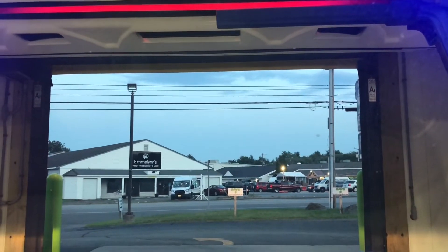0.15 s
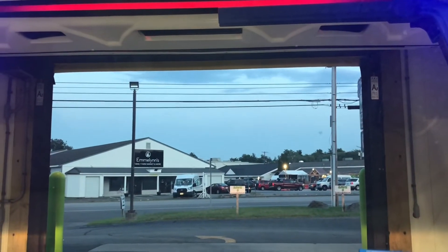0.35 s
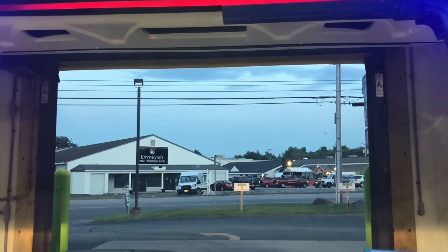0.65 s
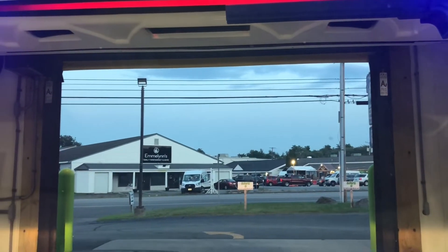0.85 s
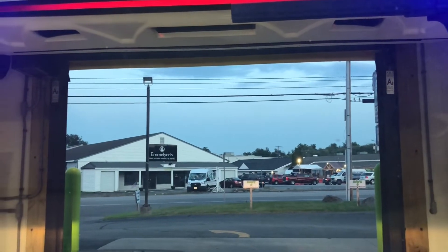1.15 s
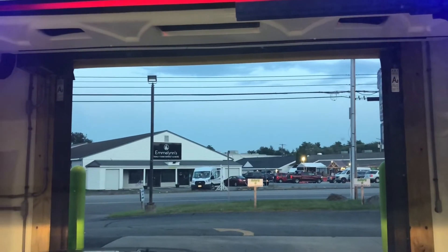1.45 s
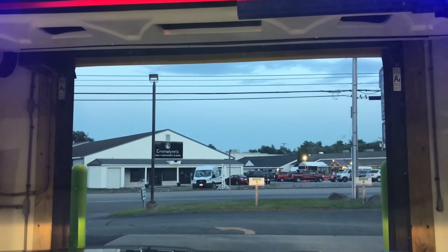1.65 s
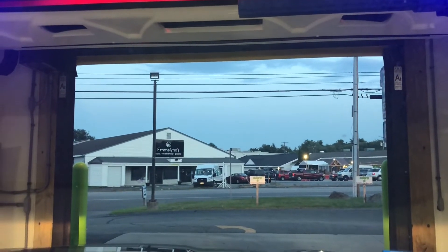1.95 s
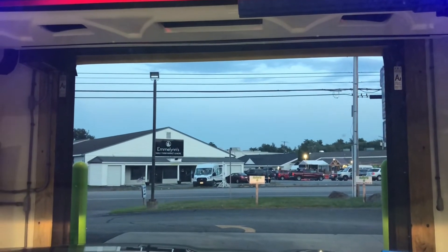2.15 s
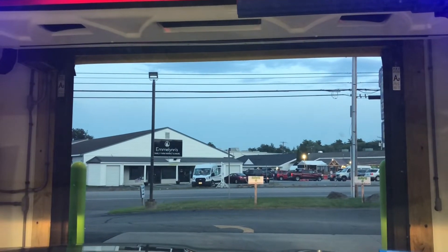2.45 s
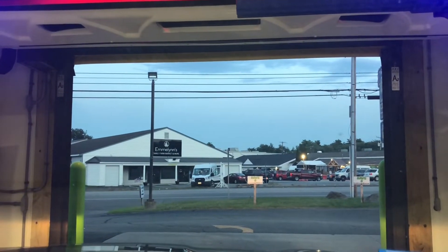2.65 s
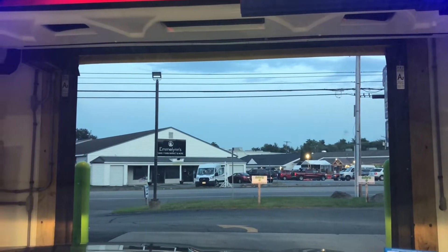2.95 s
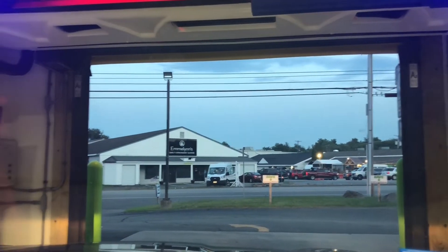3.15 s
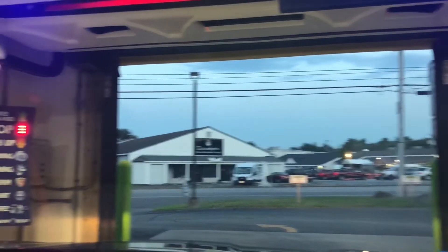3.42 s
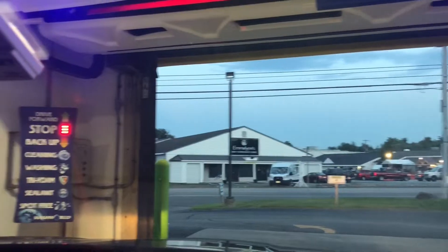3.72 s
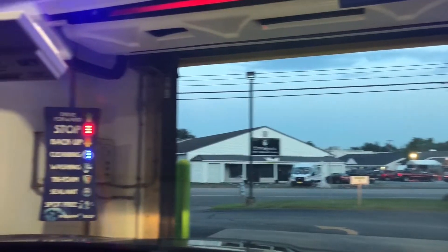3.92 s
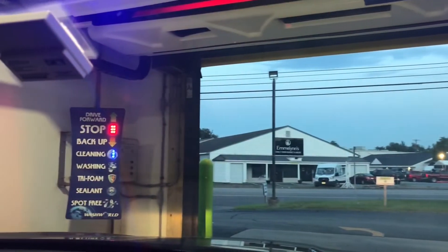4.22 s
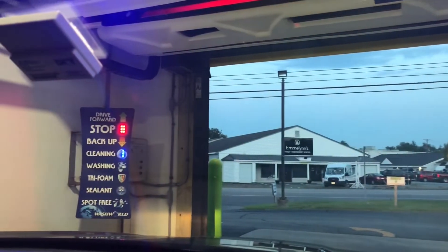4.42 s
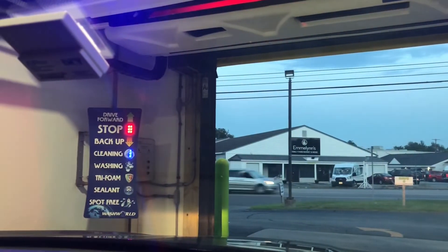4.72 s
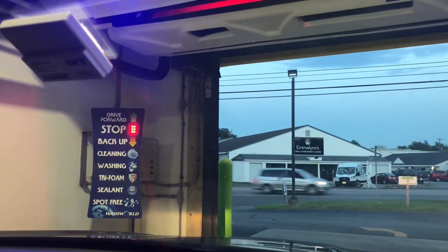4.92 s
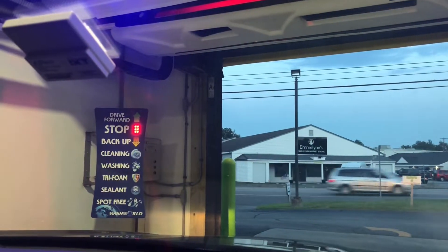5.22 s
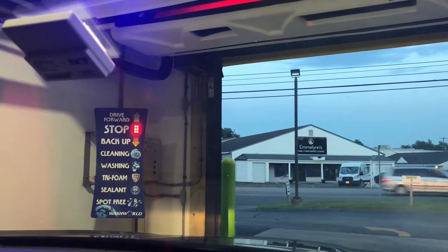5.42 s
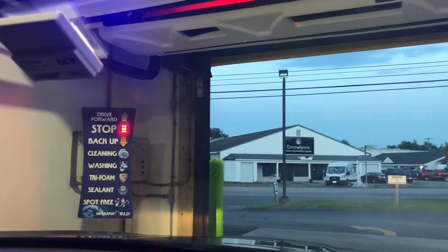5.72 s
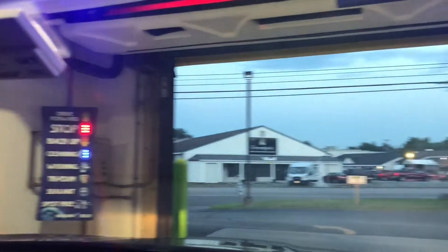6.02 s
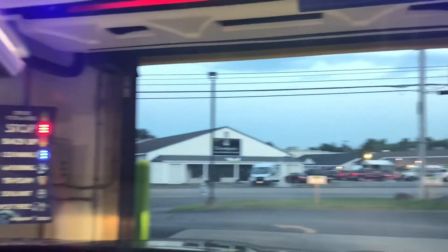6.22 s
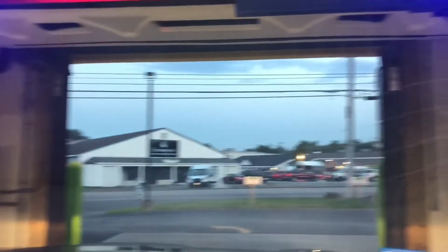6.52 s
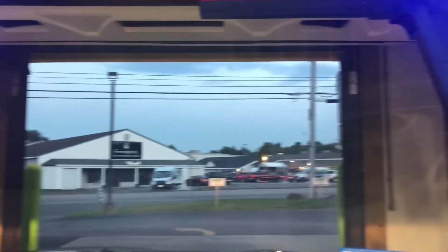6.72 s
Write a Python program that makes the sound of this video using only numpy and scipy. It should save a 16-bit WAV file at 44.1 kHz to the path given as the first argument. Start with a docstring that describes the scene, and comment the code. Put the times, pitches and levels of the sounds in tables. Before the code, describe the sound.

A low motor-like pump hums evenly through the cabin of an idling car, dull and boxy, over smooth rumble. The microphone is inside, near softly rustling clothing and a few light knocks. Late on, the drone suddenly runs down with a quick swoosh and a tiny singing note. A fainter engine rumble remains, with airy hiss, growing road noise outside and soft bumps at the end.

```python
"""Pressure pump switched off in a car wash bay

A three-plunger pump drones as a stack of shaft-speed tones over flow noise, heard inside an idling car.
Switched off, it runs down in a moment, with a surge of flow noise and a short singing note.
The idle (low wavering tones), cabin rumble and road noise (coloured noise) stay; a thin hiss swells late.
Cloth rustles softly early on in bursts of noise; a few damped knocks come from inside the cabin."""
import sys
import numpy as np
from scipy import signal
from scipy.fft import rfft, irfft
from scipy.io import wavfile
from scipy.ndimage import map_coordinates

SR = 44100
rng = np.random.default_rng(int(sys.argv[2]) if len(sys.argv) > 2 else 0)


def generate_wav(sig):
    """Save sig (samples, or channels by samples) to the path in sys.argv[1] as 16-bit PCM at SR."""
    pcm = np.round(np.clip(np.atleast_2d(sig).T, -1, 1) * 32767).astype(np.int16)
    wavfile.write(sys.argv[1], SR, pcm)


N = 302785   # length [samples]

# pump tones: (multiple of shaft speed, early level [dB rms], late level [dB rms])
PUMP_TONES = [(6, -33, -35), (9, -36, -35), (12, -42, -45), (15, -46, -46), (18, -56, -61), (19, -66, -62),
              (20, -62, -59), (21, -49, -47), (23, -60, -61), (24, -59, -54), (25, -64, -63),
              (26, -68, -65), (27, -39, -39), (28, -57, -56), (29, -54, -53), (30, -59, -66),
              (31, -64, -67), (32, -67, -67), (35, -68, -69), (36, -59, -59), (38, -65, -63),
              (39, -63, -65), (40, -74, -68), (42, -66, -69), (43, -70, -68), (44, -64, -61),
              (45, -67, -66), (50, -66, -66), (51, -64, -66), (54, -71, -63), (60, -72, -68)]
# mean level of the faint tones on the other high multiples: (frequency [Hz], level [dB rms])
RATTLE_LEVELS = [(420, -70.5), (800, -77), (900, -84), (1250, -99.5)]
# idle tones: (multiple of the six-firing cycle, level [dB rms], spread of the waver [dB])
ENGINE_TONES = [(6, -48, .7), (7, -56, 3.5), (12, -57, 3.0), (15, -55, 3.0), (18, -44.5, 1.8),
                (24, -57, 3.0), (38, -59, 3.0)]
# soft knocks, each a short shudder of a panel: (time [s], level [dB], frequency [Hz], length [s])
PANEL_KNOCKS = [(.894, -47, 720, .016), (.913, -34, 138, .025), (1.203, -34, 138, .025),
                (5.76, -48, 380, .014), (6.777, -33, 292, .017), (6.845, -35, 105, .02)]
# standing waves in glass and cabin, which colour all noise: (centre [Hz], width [Hz], gain [dB])
CABIN_MODES = [(956, 35, 1.5), (1060, 71, -4.5), (1154, 55, 4), (1242, 30, -7.5), (1298, 23, 4.5),
               (1384, 100, -4.5), (1597, 110, 5.5)]
# strokes of cloth: (start [s], fine level [dB], coarse level [dB], rise [s], hold [s])
CLOTH_STROKES = [(.44, -73.5, -77, .25, 0.089), (.66, -76, -70, .2, .1), (.98, -79.5, -68.5, 0.2, .12)]
# swells of the hiss: (start [s], level [dB], rise [s], hold [s], 20 dB fall [s])
HISS_SURGES = [(3.8, -76, .25, .35, .5), (4.5, -74, .2, .1, .9), (5.93, -73, .1, .12, .3),
               (6.2, -70.5, .33, .05, .7)]
# one swell of the rumble: (start [s], level [dB], rise [s], hold [s], 20 dB fall [s])
RUMBLE_RISE = (3.5, -44.5, 1.5, 0.4, 2.5)

# Noise spectra, before the cabin colours them: (frequency [Hz], relative level [dB per Hz])
# water flow in the pump
FLOW_SPECTRUM = [(60, -17), (130, 4.5), (200, 5), (300, -7), (420, -9.5), (600, -8.5), (750, -11),
                 (1000, -21), (1600, -43.5)]
# fine part of the cloth rustle: (frequency [Hz], relative level [dB per Hz])
FINE_SPECTRUM = [(3000, -15), (6000, -3), (9000, 0), (15900, -1)]
# coarse part of the cloth rustle: (frequency [Hz], relative level [dB per Hz])
COARSE_SPECTRUM = [(1800, -12), (2800, 0), (4500, -3), (8000, -9), (15900, -20)]
# thin hiss in two bands: (frequency [Hz], relative level [dB per Hz])
HISS_SPECTRUM = [(1900, -14), (2450, 6), (3000, -9), (4500, -5.5), (6500, -2.5), (7500, -6.5), (9500, -14),
                 (15900, -13.5)]
# tyre roar: (frequency [Hz], relative level [dB per Hz])
ROAD_SPECTRUM = [(500, -16.5), (850, 1.5), (1200, 0), (1500, -9), (1900, -14), (2500, -17), (4500, -24)]
# cabin rumble: (frequency [Hz], relative level [dB per Hz])
RUMBLE_SPECTRUM = [(25, -25.5), (34, -16), (48, -10), (65, -9), (105, -0.5), (150, -5), (190, -11),
                   (240, -17), (350, -15), (500, -24), (650, -23), (800, -34.5)]
# steady upper floor: (frequency [Hz], relative level [dB per Hz])
AIR_SPECTRUM = [(400, -12.5), (800, -2.5), (1050, -1.5), (1300, -8), (2000, -11.5), (3000, -17.5),
                (4500, -22), (6000, -25.5), (9000, -31), (11500, -32), (13500, -35), (15200, -32),
                (16500, -31)]

# Pump at work
SHAFT_HZ, FIRST_STROKE_S, PLUNGERS = 13.745, .0007, 3
EARLY_S, LATE_S = 1.25, 3.75   # moments of the two level columns of the pump tones
SPREAD = .0182   # phase lag [rad per squared multiple]: higher tones arrive later through the structure
BAY_SHARE, BAY_T60_S = .45, .7   # the bay holds this share of each tone and lets it ring out

# Run-down after the switch: share of full speed lost each second, and how the tones die
SWITCH_OFF_S, SPEED_LOSS_PER_S, SLOWEST_SHARE = 5.1, .96, .65
HIGH_TONES_HZ = 100   # tones above this die first when the pressure drops
HIGH_FALL_DB_PER_S, LOW_HOLD_S, LOW_FALL_DB_PER_S = 214, .15, 450

# Flow noise: steady while pumping, a surge as the pump unloads, later the pressure bleeds away
FLOW_DB, BLEED_HOLD_S, BLEED_DB_PER_S = -49, .79, 23
SURGE_DB, SURGE_RISE_S, SURGE_FALL_S = -44, .049, .33

# The pressure line sings on as the pump unloads
SING_S, SING_DB, SING_RISE_S, SING_HOLD_S, SING_FALL_S = 5.12, -42.5, .042, .025, .013
SING_HZ, SING_CLIMB_HZ_PER_S = 375, 90

# Six-cylinder idle, which drops a little late on
IDLE_FIRINGS_PER_S, IDLE_SAG_FIRINGS_PER_S, IDLE_SAG_S = 36.63, .35, 5.3

# Surroundings
RUSTLE_FALL_S = .49   # time to lose 20 dB
GUSTS_DB, GUSTS_PER_S = 1.0, 12   # unevenness of rustle, hiss and road noise
HISS_DB, HISS_SETS_IN_S = -78.5, 1.2
ROAD_DB, CAR_DB, CAR_S, CAR_RISE_S = -67.5, -57, 5.61, .86   # far traffic, then a car draws near
RUMBLE_DB, RUMBLE_LUMPS_DB, AIR_DB = -43, 1.5, -60
CUTOFF_HZ = 15950


def from_db(db):
    """Gain of a level in dB."""
    return 10 ** (np.asarray(db) / 20)


def at_hz(points, hz):
    """A level curve read on a log-frequency axis, -120 dB outside its ends."""
    curve_hz, curve_db = np.array(points).T
    return np.interp(np.log(hz), np.log(curve_hz), curve_db, -120, -120)


def since(start_s):
    """Seconds gone by after a moment, nought before it."""
    return np.maximum(np.arange(N) / SR - start_s, 0)


def swell(start_s, rise_s, hold_s, fall_s):
    """Gain that rises smoothly to one, holds, then loses 20 dB every fall time."""
    rising = np.sin(np.pi / 2 * np.minimum(since(start_s) / rise_s, 1))
    return rising * from_db(-20 * since(start_s + rise_s + hold_s) / fall_s)


def drift(rate):
    """Smooth random wander through rate normal values a second."""
    knots = rng.standard_normal(200)
    return map_coordinates(knots, [np.arange(N) / SR * rate], order=3, mode="wrap")


def tone(db, angle):
    """A sine of the given rms level."""
    return np.sqrt(2) * from_db(db) * np.sin(angle)


def coloured(points):
    """Noise of the given spectrum as the cabin modes colour it, rms 1."""
    hz = np.maximum(np.arange(N // 2 + 1) * SR / N, 1)
    db = at_hz(points, hz)
    for centre_hz, width_hz, gain_db in CABIN_MODES:
        db = db + gain_db / (1 + (2 * (hz - centre_hz) / width_hz) ** 2)
    noise = irfft(rfft(rng.standard_normal(N)) * from_db(db), N)
    return noise / np.std(noise)


def gusty(gain, spectrum):
    """Noise under a gain, coming unevenly."""
    return gain * from_db(GUSTS_DB * drift(GUSTS_PER_S)) * coloured(spectrum)


def pump_tones():
    """Strokes of the plungers line up as pulses; unequal plungers fill in the multiples between."""
    t, off = since(0), since(SWITCH_OFF_S)
    speed = np.maximum(1 - SPEED_LOSS_PER_S * off, SLOWEST_SHARE)
    angle = 2 * np.pi * SHAFT_HZ * (np.cumsum(speed) / SR - FIRST_STROKE_S)
    held_angle = 2 * np.pi * SHAFT_HZ * (t - FIRST_STROKE_S)   # echoes keep the pitch of full speed
    low_fall_db = -LOW_FALL_DB_PER_S * since(SWITCH_OFF_S + LOW_HOLD_S)
    high_fall_db = -HIGH_FALL_DB_PER_S * off
    echo_fall_db = -60 * off / BAY_T60_S
    progress = (t - off - EARLY_S) / (LATE_S - EARLY_S)   # stands still after the switch

    out, listed = 0, []
    for multiple, early_db, late_db in PUMP_TONES:
        k = round(multiple)
        listed.append(k)
        # multiples of the plunger count share one phase, the rest fall at random
        phase = rng.uniform(0, 2 * np.pi) * (k % PLUNGERS > 0) - np.pi / 2 - SPREAD * k ** 2
        db = early_db + (late_db - early_db) * progress + .37 * drift(2.7)
        fall_db = high_fall_db if k * SHAFT_HZ > HIGH_TONES_HZ else low_fall_db
        out = out + (1 - BAY_SHARE) * tone(db + fall_db, k * angle + phase)
        out = out + BAY_SHARE * tone(db + echo_fall_db, k * held_angle + phase)

    for k in range(31, 90):   # faint rattle on the multiples not listed
        scatter_db, phase = rng.normal(0, 3.9), rng.uniform(0, 2 * np.pi)
        if k not in listed:
            db = at_hz(RATTLE_LEVELS, k * SHAFT_HZ) + scatter_db
            out = out + tone(db + high_fall_db, k * angle + phase)
    return out


def pump_flow():
    """Flow noise holds past the switch, then fades as pressure bleeds away; the surge adds its power."""
    steady = from_db(FLOW_DB - BLEED_DB_PER_S * since(SWITCH_OFF_S + BLEED_HOLD_S))
    surge = from_db(SURGE_DB) * swell(SWITCH_OFF_S, SURGE_RISE_S, 0, SURGE_FALL_S)
    return np.hypot(steady, surge) * coloured(FLOW_SPECTRUM)


def pressure_line():
    """A short climbing note near the pump's strongest high tone."""
    hz = SING_HZ + SING_CLIMB_HZ_PER_S * since(SING_S)
    note = tone(SING_DB, 2 * np.pi * np.cumsum(hz) / SR)
    return swell(SING_S, SING_RISE_S, SING_HOLD_S, SING_FALL_S) * note


def engine():
    """Low tones of the idle, locked to the firing cycle, each wavering in level on its own."""
    firings = IDLE_FIRINGS_PER_S - IDLE_SAG_FIRINGS_PER_S * (since(IDLE_SAG_S) > 0)
    cycle = 2 * np.pi * np.cumsum(firings) / SR / 6   # six firings to a cycle
    out = 0
    for multiple, db, waver_db in ENGINE_TONES:
        phase = rng.uniform(0, 2 * np.pi)
        out = out + tone(db + waver_db * drift(3.6), round(multiple) * cycle + phase)
    return out


def knocks():
    """A few cycles with overtones, starting fast and damped at the end."""
    out = np.zeros(N)
    for start_s, db, hz, length_s in PANEL_KNOCKS:
        t = np.arange(round(2 * length_s * SR)) / SR
        shape = (1 - np.exp(-t / .001)) / (1 + (t / length_s) ** 8)
        angle = 2 * np.pi * hz * t
        ring = np.sin(angle) + .3 * np.sin(1.5 * angle) + .25 * np.sin(2 * angle)
        start = round(start_s * SR)
        out[start:][:len(t)] += (from_db(db) * shape * ring)[:N - start]
    return out


def rustle():
    """Each stroke of cloth stirs a fine and a coarse noise in its own mix; strokes add in power."""
    fine_power, coarse_power = 0, 0
    for start_s, fine_db, coarse_db, rise_s, hold_s in CLOTH_STROKES:
        shape = swell(start_s, rise_s, hold_s, RUSTLE_FALL_S)
        fine_power = fine_power + (from_db(fine_db) * shape) ** 2
        coarse_power = coarse_power + (from_db(coarse_db) * shape) ** 2
    return gusty(np.sqrt(fine_power), FINE_SPECTRUM) + gusty(np.sqrt(coarse_power), COARSE_SPECTRUM)


def hiss():
    """A steady hiss sets in; the swells add their power to it."""
    power = (from_db(HISS_DB) * swell(0, HISS_SETS_IN_S, 0, np.inf)) ** 2
    for start_s, db, *shape in HISS_SURGES:
        power = power + (from_db(db) * swell(start_s, *shape)) ** 2
    return gusty(np.sqrt(power), HISS_SPECTRUM)


def cabin_rumble():
    """Lumpy low noise with one slow swell added in power."""
    start_s, db, *shape = RUMBLE_RISE
    level = np.hypot(from_db(RUMBLE_DB), from_db(db) * swell(start_s, *shape))
    return level * from_db(RUMBLE_LUMPS_DB * drift(7.0)) * coloured(RUMBLE_SPECTRUM)


def road():
    """Tyre roar beyond the open door: far traffic, plus the power of a car that draws near."""
    car = from_db(CAR_DB) * swell(CAR_S, CAR_RISE_S, 0, np.inf)
    return gusty(np.hypot(from_db(ROAD_DB), car), ROAD_SPECTRUM)


def air():
    """The steady upper floor of noise."""
    return from_db(AIR_DB) * coloured(AIR_SPECTRUM)


def scene():
    """Everything as it reaches the cabin, one channel."""
    machines = pump_tones() + pump_flow() + pressure_line() + engine()
    close_by = knocks() + rustle()
    background = hiss() + cabin_rumble() + road() + air()
    return (machines + close_by + background)[None]


def record(dry):
    """A steep low-pass, already settled at the start, cuts the top."""
    sos = signal.cheby2(24, 60, CUTOFF_HZ, fs=SR, output="sos")
    settled = signal.sosfilt_zi(sos) * dry[0, 0]
    return signal.sosfilt(sos, dry[0], zi=settled)[0][None]


dry = scene()
out = record(dry)
generate_wav(out)
```